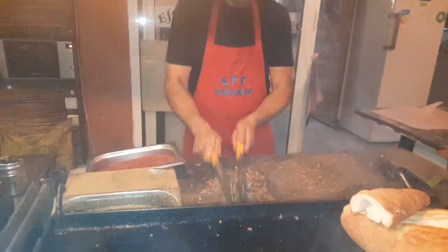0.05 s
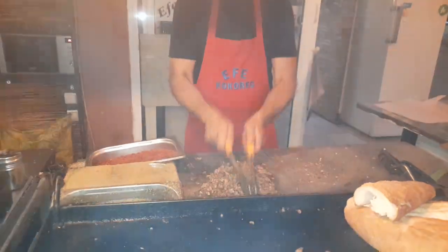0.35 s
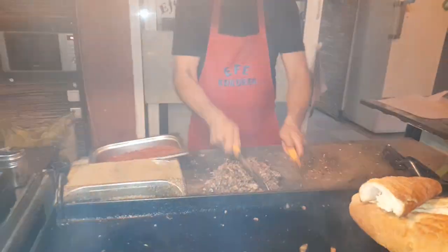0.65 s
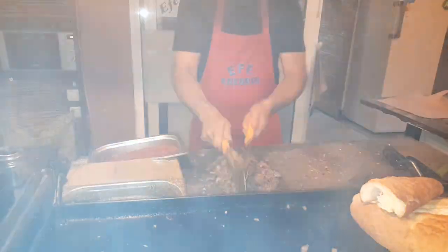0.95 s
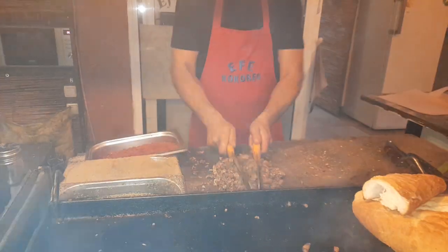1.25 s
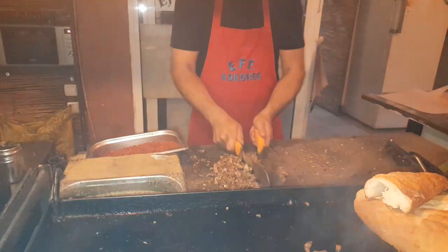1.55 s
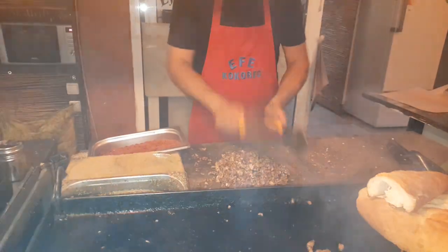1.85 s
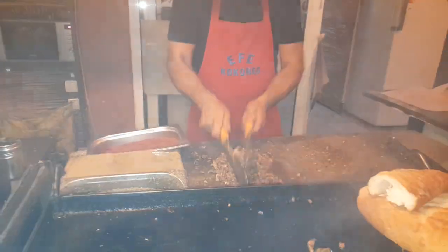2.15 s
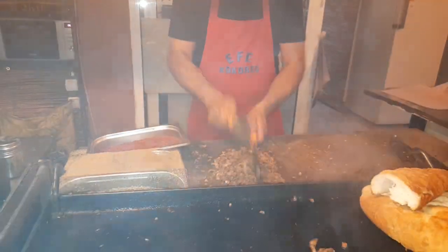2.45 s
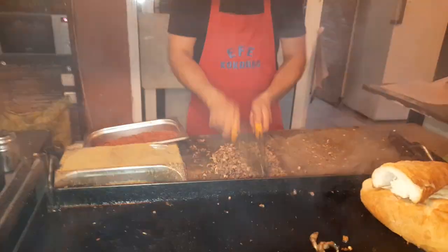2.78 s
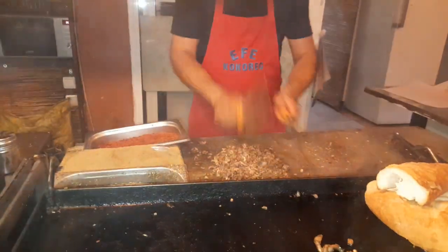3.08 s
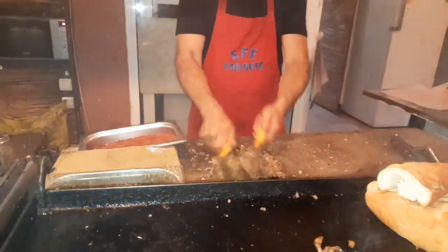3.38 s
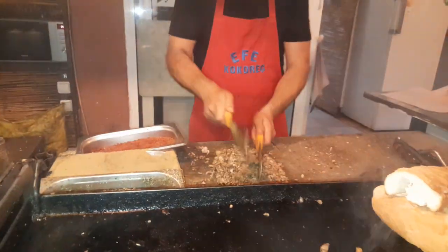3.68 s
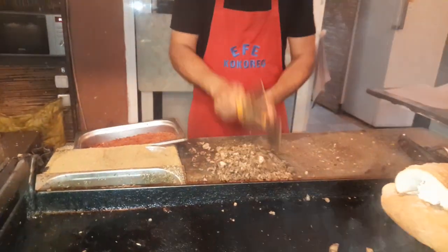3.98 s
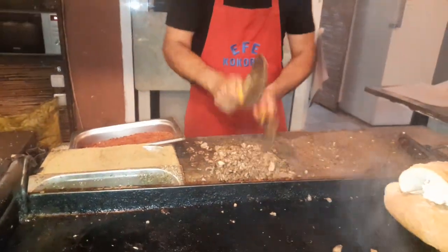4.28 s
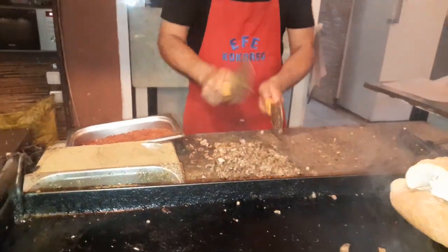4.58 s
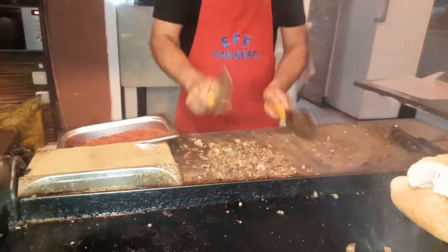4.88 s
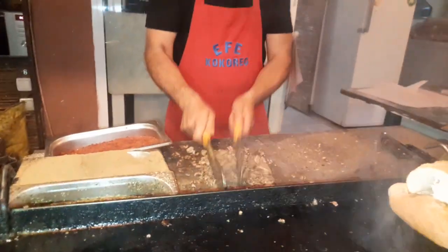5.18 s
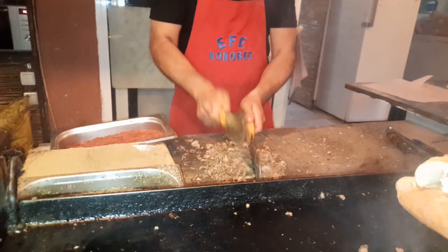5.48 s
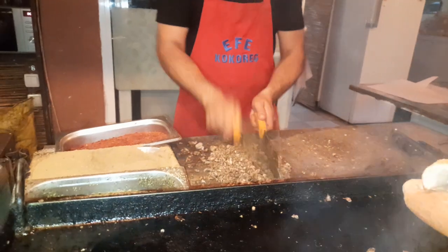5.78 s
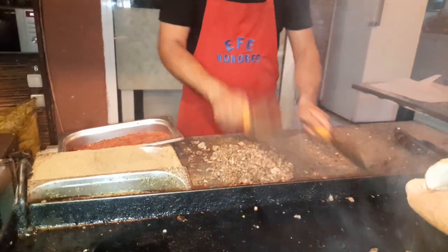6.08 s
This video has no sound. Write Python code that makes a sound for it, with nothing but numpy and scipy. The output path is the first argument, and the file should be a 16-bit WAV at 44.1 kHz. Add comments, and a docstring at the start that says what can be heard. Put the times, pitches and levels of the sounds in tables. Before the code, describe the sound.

At a street food stall, an extractor fan hums and minced meat sizzles softly on a griddle. Almost at once two steel spatulas start chopping, about three or four blows a second, thumping, knocking and clanging on the plate. Between chops the blades tick, scrape and clash, twice ringing faintly. The chops land harder in the last third, and two sharp ticks close. Heard from just in front of the griddle.

```python
"""A street-food stall: an extractor fan hums and minced meat sizzles on a hot griddle throughout.
Almost at once two steel spatulas start chopping. Each chop thumps the plate and spits; a blade that
bites through to the steel adds a hard knock, a square one a clang. Between chops the blades tick,
scrape and clash, and just before 1 s one sings faintly. From about 4 s the chops land harder on the
whole, a blade sings again, and two sharp ticks close the scene."""
import sys
import numpy as np
from scipy import signal
from scipy.fft import rfft, irfft, next_fast_len
from scipy.io import wavfile

SR = 44100
rng = np.random.default_rng(int(sys.argv[2]) if len(sys.argv) > 2 else 0)


def wrap_up_sound(samples):
    """Save the sound to the file named by the first command line argument, as 16-bit audio."""
    columns = np.atleast_2d(samples).T
    # keep every value between -1 and 1, then stretch to whole-number steps
    tamed = np.clip(columns, -1, 1)
    steps = np.round(tamed * 32767).astype(np.int16)
    wavfile.write(sys.argv[1], SR, steps)


N = 270774

# reverb time of the stall: (frequency [Hz], t60 [s])
STALL_DECAY = [(100, 0.61), (400, 0.36), (1000, 0.4), (2700, 0.3), (6000, 0.29), (10000, 0.28),
               (16000, 0.11)]
# early reflections off the hood and counter: (delay [s], gain [factor])
HOOD_ECHOES = [(0.00661, 0.11), (0.00704, 0.63), (0.00868, 0.52), (0.0135, 0.62), (0.0148, 0.13),
               (0.021, 0.27), (0.0236, -0.22)]
# two microphone ports face different ways and hear steel unequally: (frequency [Hz], left - right [dB])
PORT_BALANCE = [(2000, 1.5), (4000, -9), (6200, -15), (9500, -13.5), (12000, -4.5), (15000, 1)]
# colour of the fan's rushing air: (frequency [Hz], relative level [dB])
FAN_COLOUR = [(15, -42), (25, -27), (75, 0.5), (109, -2), (133, -4), (168, -6), (345, -7.5), (425, -16),
              (556, -20), (604, -15), (758, -19.5), (971, -24.5), (2310, -25.5), (2680, -29.5), (3500, -30),
              (4550, -30), (7700, -120)]
# how alike that air is left and right: (frequency [Hz], correlation [0-1])
FAN_LIKENESS = [(60, 0.97), (200, 0.97), (500, 1), (1200, 0)]
# colour of frying fat: (frequency [Hz], relative level [dB])
SIZZLE_COLOUR = [(1200, -19.5), (2600, -14.5), (4200, -6), (5400, 10), (7300, 1.5), (7900, -12),
                 (10000, -2), (15500, -4), (16500, -29.5)]
# colour of steel on steel: (frequency [Hz], relative level [dB])
STEEL_COLOUR = [(400, -2), (1200, -13), (2300, -1), (2900, -8), (4400, -7.5), (5400, 1), (7400, -6),
                (8000, -16.5), (9200, -14), (12000, -13.5), (15500, -19.5), (16500, -42)]
# a lifted blade rings on: (time [s], frequency [Hz], level [dB], t60 [s])
BLADE_RINGS = [(4.735, 2659, -50, 1.5), (4.735, 3112, -62, .9), (.95, 2400, -55, .9)]
# a blade dragged over the plate: (start [s], end [s], rasp level [dB], squeal level [dB])
BLADE_DRAGS = [(.765, .83, -56, -58), (.815, .915, -48, -53), (3.345, 3.44, -50, -59)]
# stick-slip partials of the dragged edge: (frequency [Hz], relative level [dB])
SQUEAL_PARTIALS = [(2955, -9), (6298, -14), (7547, 0), (14002, -9)]
# a blade tip striking steel: (time [s], level [dB], brightness [dB/octave])
TIP_STRIKES = [(0.228, -33.5, 7), (1.869, -35, 18), (2.093, -30, 9), (2.145, -24, 12), (2.211, -31, 3),
               (3.0782, -16, 9), (3.6177, -26.5, 3.5), (3.696, -31.5, 18), (3.9462, -33, 8),
               (4.0073, -17.5, 11.5), (4.2074, -29.5, 5), (4.5864, -21, 2.5), (5.1472, -21, 6.5),
               (5.669, -29, 13), (6.06, -18.5, 20.5), (6.0783, -16, -2.5)]
# one blade wiped on the other: (time [s], relative level [dB], contact [s], brightness [dB/octave])
BLADE_WIPES = [(0.9499, -21, 0.014, 5), (1.305, -26, .014, 2.5), (2.24, -43, 0.016, -3),
               (2.3547, -31.5, .018, 3.5), (3.4619, -25, 0.014, 3.5), (3.828, -31.5, 0.011, 3),
               (4.4228, -24.5, 0.0058, 2.5)]
# plate modes woken by a square blade: (frequency [Hz], relative level [dB], t60 [s])
CLANG_MODES = [(582, 1.5, 0.035), (605.6, 2.5, 0.059), (694.3, -3.5, 0.032), (788, 1, 0.048),
               (844, 1.5, 0.05)]
# higher plate modes woken by a hit on bare steel: (frequency [Hz], width [Hz], relative level [dB])
BARE_STEEL_MODES = [(850, 300, -10), (1101, 25, -5.5), (1169, 49, 7), (1400, 120, -20), (1722, 62, -3.5),
                    (2190, 55, -13), (2680, 66, -31)]
# colour of a knock's broad crack: (frequency [Hz], relative level [dB])
CRACK_COLOUR = [(150, -1.5), (400, 1.5), (750, 4.5), (1100, 1.5), (1700, -7.5), (2400, -14), (3500, -23),
                (6500, -33.5), (8500, -62.5), (16000, -48)]
# low plate modes, the body of a chop: (frequency [Hz], relative level [dB], t60 [s])
THUMP_MODES = [(89, -24, .22), (165, -34, .13), (293, -7.5, .035), (424, 5, .018), (550, 4, .01),
               (872, -12, .045)]
# blade edges landing: (time [s], force [dB], bite [0 all meat, 1 or more bare steel], squareness [0-1])
CHOP_HITS = [(0.146, -8.5, 0.52, 0.74), (0.3656, -8.5, 0.13, 0.5), (0.6738, -3.5, 1.13, 0.37),
             (.738, -16.5, 1.04, 0.88), (0.9149, -1, 0.43, 0.97), (1.123, -24.5, 0, 0.59),
             (1.325, -18.5, 0.2, 0.55), (1.598, -9.5, 0.05, 0.1), (1.618, -1.5, 0.89, 0),
             (1.957, -3, 0.61, 0.81), (1.987, -6.5, 0.71, 0.3), (2.189, -14, 0.46, 0.48),
             (2.373, -7, 0.53, 0.52), (2.521, -19, 0.1, 0.1), (2.866, -10, 0.3, 0.3),
             (2.874, -1.5, 0.97, 0.15), (3.1947, -3, 1, 0.14), (3.293, -20, 1.2, 0.86),
             (3.4355, -4.5, 0.65, 0.9), (3.6424, -10.5, 0.68, 0.14), (3.8365, -5.5, 0.13, 0.75),
             (4.1042, -10, 0.8, 0.5), (4.11, -1, .6, 0.1), (4.4349, -2, 0.85, 0.2), (4.7351, 0, 0.2, 0.6),
             (4.7434, -3.5, 0.17, 0.96), (5.029, -1.5, 0.53, 0), (5.0383, -2, 0.71, 0.79),
             (5.245, -0.5, 0.5, 0.46), (5.4294, -3.5, 0.61, 0.08), (5.502, -13.5, 0, 0),
             (5.8433, -11, 0.32, 0.28), (5.877, 0.5, 0.53, 0.17)]


def amp(db):
    """Decibels to gain."""
    return 10 ** (np.asarray(db) / 20)


def share(x):
    """Keeps a share between 0 and 1."""
    return np.clip(x, 0, 1)


def unit(x):
    """Scales to rms 1."""
    return x / np.sqrt(np.mean(x ** 2) + 1e-20)


def read(points, hz):
    """Reads a table on a log-frequency axis."""
    f, value = np.transpose(points)
    return np.interp(np.log(hz + 1), np.log(f), value)


def add(mix, s, sound):
    """Lays a sound into the mix at s seconds."""
    part = mix[..., max(round(s * SR), 0):][..., :sound.shape[-1]]
    part += sound[..., :part.shape[-1]]


def pan(x, left_db):
    """Sets the left channel left_db above the right."""
    return x * amp([[left_db / 2], [-left_db / 2]])


def band(x, low_hz, high_hz):
    """A gentle band-pass."""
    return signal.sosfilt(signal.butter(2, [low_hz, high_hz], "band", fs=SR, output="sos"), x)


def mode(t, hz, t60):
    """One struck resonance: a sine that falls 60 dB in t60 seconds."""
    return np.exp(-np.log(1000) * t / t60) * np.sin(2 * np.pi * hz * t)


def wander(rate_hz, size):
    """A smooth random modulator of rms 1 that moves at about the given rate."""
    padded = next_fast_len(size, real=True)
    lowpass = np.exp(-(np.fft.rfftfreq(padded, 1 / SR) / rate_hz) ** 2)
    return unit(irfft(rfft(rng.standard_normal(padded)) * lowpass, padded)[:size])


def noise(colour, size, likeness=0., bright_db=0.):
    """Coloured stereo noise of a given left-right likeness, tilted by bright_db an octave above 3 kHz."""
    hz = np.fft.rfftfreq(size, 1 / SR)
    left, other = rfft(rng.standard_normal((2, size)))
    right = likeness * left + np.sqrt(1 - likeness ** 2) * other
    tilt_db = bright_db * np.log2(np.maximum(hz, 3000) / 3000)
    return unit(irfft(np.array([left, right]) * amp(read(colour, hz) + tilt_db), size))


def stall(x, build_s):
    """Diffuse reverb: sparse taps swell, then die band by band; the paths shift as the hands move."""
    size, out = 30000, np.zeros((2, N))
    for k in range(3):
        taps = rng.standard_normal((2, size)) * (rng.random((2, size)) < 0.1)
        hz, t, spectrum = signal.stft(taps, SR, nperseg=256)
        decay = amp(-60 * t / read(STALL_DECAY, hz)[:, None])
        tail = signal.istft(spectrum * decay, SR, nperseg=256)[1]
        tail *= 1 - np.exp(-(np.arange(tail.shape[1]) / SR / build_s) ** 2)
        tail /= np.linalg.norm(tail[0])
        crossfade = np.sqrt(2 / 3) * np.cos(np.pi * (np.arange(N) / SR + k / 3))
        out += signal.fftconvolve(np.atleast_2d(x) * crossfade, tail, axes=1)[:, :N]
    return out


def hood(x):
    """The direct sound and its first reflections off nearby steel."""
    out = x.copy()
    for delay_s, gain in HOOD_ECHOES:
        add(out, delay_s, gain * x)
    return out


def ports(x):
    """Direct sound as the two ports hear it: most of the treble leans right."""
    size = next_fast_len(N, real=True)
    side_db = read(PORT_BALANCE, np.fft.rfftfreq(size, 1 / SR)) / 2
    return irfft(rfft(x, size) * amp([side_db, -side_db]), size)[:, :N]


def fan(air_db=-43, hum_hz=91, hum_db=-48, waver_hz=9, rumble_db=-47):
    """The bed: rushing air, a low, unsteady hum and gusts of rumble from the duct."""
    likeness = read(FAN_LIKENESS, np.fft.rfftfreq(N, 1 / SR))
    air = noise(FAN_COLOUR, N, likeness) * amp(wander(6, N))
    pitch_hz = hum_hz + waver_hz * wander(16.3, N)
    hum = np.sin(2 * np.pi * np.cumsum(pitch_hz) / SR) * amp(3.2 * wander(15, N))
    rumble = band(rng.standard_normal(N), low_hz=55, high_hz=130) * amp(4 * wander(10, N))
    return pan(amp(air_db) * air + amp(hum_db) * unit(hum) + amp(rumble_db) * unit(rumble), left_db=-3)


def steam(events, fade_s, rise_s=0.013):
    """Envelope of the steam since the latest event: a quick rise, then it dries off."""
    t = np.arange(N) / SR
    starts = np.sort([-np.inf] + [row[0] for row in events])
    age = t - starts[np.searchsorted(starts, t) - 1]
    return (1 - np.exp(-age / rise_s)) * np.exp(-age / fade_s)


def sizzle(hiss_db=-60, pops_db=-73, pops_per_s=160, spread_db=8, flutter_db=3.16, drying_db_per_s=0.14):
    """A fine hiss of steam and tiny pops of fat; both swell as meat is pressed or wiped off a blade."""
    pop_gains = amp(spread_db * np.minimum(rng.exponential(1, N), 4))
    triggers = pop_gains * (rng.random(N) < pops_per_s / SR)
    pop = noise(STEEL_COLOUR, size=256, bright_db=3) * np.exp(-np.arange(256) / SR / .0005)
    pops = unit(signal.oaconvolve(triggers[None], pop, axes=1)[:, :N])
    swell_db = 5.5 * steam(CHOP_HITS, fade_s=0.055) + 3.5 * steam(BLADE_WIPES, fade_s=0.13)
    drying_db = drying_db_per_s * np.arange(N) / SR
    envelope = amp(swell_db - drying_db + flutter_db * wander(15, N))
    return envelope * ports(amp(hiss_db) * noise(SIZZLE_COLOUR, N) + amp(pops_db) * pops)


def rings():
    """A blade lifted clear after a blow sings faintly."""
    t, out = np.arange(SR) / SR, np.zeros(N)
    for s, hz, db, t60 in BLADE_RINGS:
        add(out, s, amp(db) * mode(t, hz, t60))
    return out


def scrapes(waver=0.009, room_db=-6):
    """A dragged edge rasps, and squeals thinly as it sticks and slips."""
    out = np.zeros((2, N))
    for start, end, rasp_db, squeal_db in BLADE_DRAGS:
        size = round((end - start) * SR)
        wavering_t = np.cumsum(1 + waver * wander(200, size)) / SR
        partials = sum(amp(db) * np.sin(2 * np.pi * hz * wavering_t) for hz, db in SQUEAL_PARTIALS)
        squeal = amp(squeal_db) * unit(partials * amp(6 * wander(90, size)))
        rasp = amp(rasp_db) * noise(STEEL_COLOUR, size)
        add(out, start, (rasp + squeal) * signal.windows.tukey(size, .5))
    return ports(out) + amp(room_db) * stall(out, build_s=0.009)


def grazes(per_s=3, top_db=-34, spread_db=9, bright_db=5, bright_spread_db=6):
    """Faint chance touches of the tips, scattered evenly through the work: rows like TIP_STRIKES."""
    count = round(per_s * N / SR)
    when, softness, colour = rng.random((count, 3)).T
    times = (np.arange(count) + when) / count * N / SR
    return list(zip(times, top_db - spread_db * softness, bright_db + bright_spread_db * (colour - .5)))


def ticks(snap_s=0.0012, scatter_db=-21, scatter_s=0.008, room_db=-10):
    """A tip strikes steel: one dry snap, then its scatter off the griddle and hood."""
    size = 4096
    t, out = np.arange(size) / SR, np.zeros((2, N))
    bloom = t / scatter_s * np.exp(1 - t / scatter_s)
    for s, db, bright_db in TIP_STRIKES + grazes():
        snap = noise(STEEL_COLOUR, size, bright_db=bright_db) * np.exp(-t / snap_s)
        snap /= np.sqrt(np.sum(snap ** 2, axis=1, keepdims=True) / (snap_s * SR / 2))  # equal energy
        scatter = noise(STEEL_COLOUR, size, bright_db=bright_db + 3) * bloom
        add(out, s, amp(db) * (snap + amp(scatter_db) * scatter))
    return ports(out) + amp(room_db) * stall(out, build_s=0.0012)


def blade_body(x, t60=0.008, count=400):
    """Rings x through the many close, hand-damped modes of a thin steel blade."""
    t = np.arange(4000) / SR
    hz = rng.uniform(1760, 16090, (count, 1))
    ring = rng.standard_normal((2, count)) @ mode(t, hz, t60)
    return signal.oaconvolve(x, ring / np.linalg.norm(ring[0]), axes=1)[:, :N]


def clinks(gain_db=3.5, chatter_db=3, attack_s=0.00028, release_s=0.0049, ring_db=-8, room_db=-6):
    """Steel chatters on steel for as long as the blades touch, then the blades and the stall ring."""
    size = 4096
    t, out = np.arange(size) / SR, np.zeros((2, N))
    for s, db, contact_s, bright_db in BLADE_WIPES:
        touch = (1 - np.exp(-t / attack_s)) * np.exp(-np.maximum(t - contact_s, 0) / release_s)
        chatter = amp(chatter_db * wander(640, size))
        add(out, s, amp(db + gain_db) * touch * chatter * noise(STEEL_COLOUR, size, bright_db=bright_db))
    near = out + amp(ring_db) * blade_body(out)
    return ports(near) + amp(room_db) * pan(stall(near, build_s=0.0043), left_db=-7)


def smacks(gain_db=-44, bite_db=-4, per_force=0.77, rise_s=0.0016, fade_s=0.017):
    """Wet meat bursts under the edge: a short spit, louder for a harder chop and thicker meat."""
    size = 4096
    t, out = np.arange(size) / SR, np.zeros((2, N))
    for s, force_db, bite, _ in CHOP_HITS:
        burst = (1 - np.exp(-t / rise_s)) * np.exp(-t / fade_s) * amp(7.2 * wander(500, size))
        spit = burst * noise(STEEL_COLOUR, size, bright_db=4)
        add(out, s, amp(gain_db + per_force * force_db + bite_db * share(bite)) * spit)
    return ports(out)


def clangs(gain_db=-4.5, slant_db=-20, detune=0.035, room_db=-10):
    """A square blow lets the middle of the plate ring on briefly; a slanted blade hardly wakes it."""
    t, out = np.arange(8192) / SR, np.zeros(N)
    for s, force_db, _, square in CHOP_HITS:
        clang_db = gain_db + force_db + slant_db * (1 - share(square))
        ring = sum((-1) ** k * amp(db) * mode(t, hz * rng.normal(1, detune), t60)
                   for k, (hz, db, t60) in enumerate(CLANG_MODES))
        add(out, s, amp(clang_db) * ring / abs(ring).max())
    out = band(out, low_hz=254, high_hz=2510)
    return pan(hood(out), left_db=-.8) + amp(room_db) * stall(out, build_s=0.0041)


def knocks(cushion_db=-17, ring_db=-21, crack_db=-9, crack_s=0.014, room_db=-4, ring_send_db=-4):
    """The edge reaches bare steel: a brief crack fills the stall and the plate's higher modes ring."""
    size = 8192
    t, ringing, cracks = np.arange(size) / SR, np.zeros(N), np.zeros((2, N))
    crack_envelope = (1 - np.exp(-t / 0.00017)) * np.exp(-t / crack_s)
    for s, force_db, bite, _ in CHOP_HITS:
        knock_db = force_db + cushion_db * (1 - share(bite))  # meat under the edge muffles the knock
        ring = np.zeros(size)
        for hz, width, db in BARE_STEEL_MODES:
            gain, pitch_hz = amp(rng.normal(db, 3.3)), hz * rng.normal(1, 0.0097)
            ring += gain * np.exp(-np.pi * width * t) * np.sin(2 * np.pi * pitch_hz * t)
        crack = noise(CRACK_COLOUR, size, likeness=0.075) * crack_envelope
        add(ringing, s, amp(knock_db + ring_db) * ring)
        add(cracks, s, amp(knock_db + crack_db) * crack)
    near = pan(cracks + hood(ringing), left_db=-1.5)
    far = amp(room_db) * stall(cracks + amp(ring_send_db) * ringing, build_s=0.0094)
    return band(near + far, low_hz=185, high_hz=7640)


def thumps(spread_db=1, detune=0.0095, room_db=-12):
    """Each chop shoves the plate's low modes; a harder, deeper or squarer blow favours the upper ones."""
    t, out = np.arange(SR // 4) / SR, np.zeros(N)
    for s, force_db, bite, square in CHOP_HITS:
        tilt_db = -3 + 6 * share(bite) + 1.5 * share(square) + 0.56 * force_db  # per octave
        ring = np.zeros(len(t))
        for k, (hz, db, t60) in enumerate(THUMP_MODES):
            gain = amp(rng.normal(db, spread_db) + tilt_db * np.log2(max(hz, 300) / 400))
            polarity = (-1) ** k  # neighbouring modes swing in opposite senses
            ring += polarity * gain * mode(t, hz * rng.normal(1, detune), t60)
        add(out, s, amp(force_db) * ring / abs(ring).max())
    # the deepest swing is cut away, and meat cushions the top end
    out = band(out, low_hz=45, high_hz=2480)
    far = amp(room_db) * stall(band(out, low_hz=298, high_hz=3000), build_s=0.013)
    return pan(hood(out), left_db=-.8) + far


def scene():
    """The mix from the front of the griddle: four-layer chops and blade work over the fan and sizzle."""
    chopping = thumps() + clangs() + knocks() + smacks()
    return chopping + clinks() + ticks() + scrapes() + rings() + fan() + sizzle()


def record(dry, ceiling=.96, cutoff_hz=16300):
    """A soft clip rounds off the loudest chops, then a steep low-pass trims the top."""
    rounded = dry / (1 + (dry / ceiling) ** 8) ** (1 / 8)
    lowpass = signal.firwin(255, cutoff_hz, window=("kaiser", 9), fs=SR)
    return signal.oaconvolve(rounded, lowpass[None], "same")


dry = scene()
out = record(dry)
wrap_up_sound(out)
```